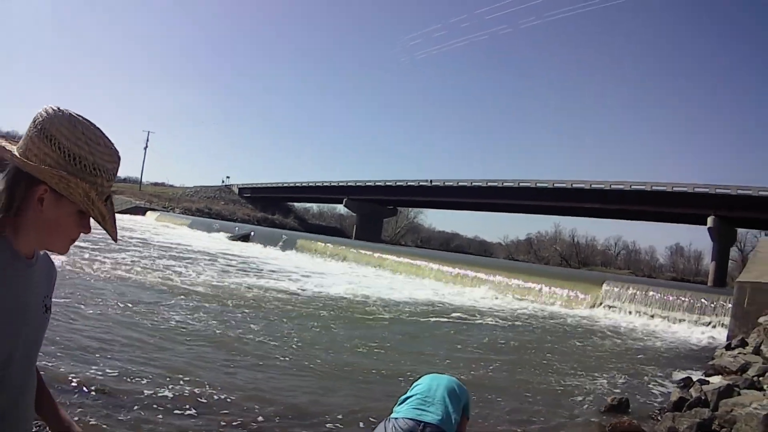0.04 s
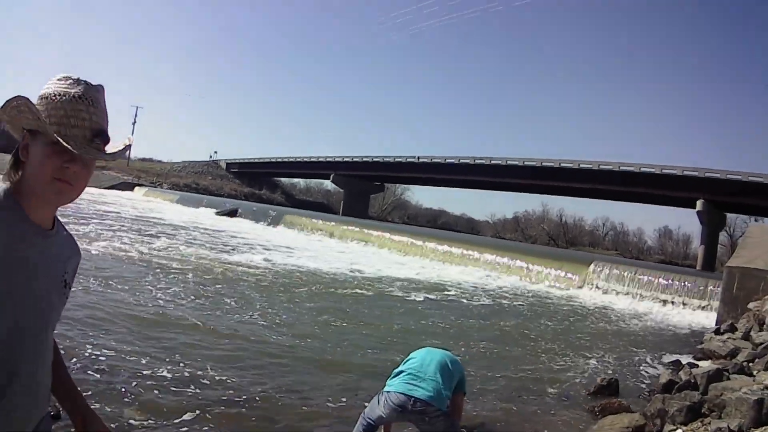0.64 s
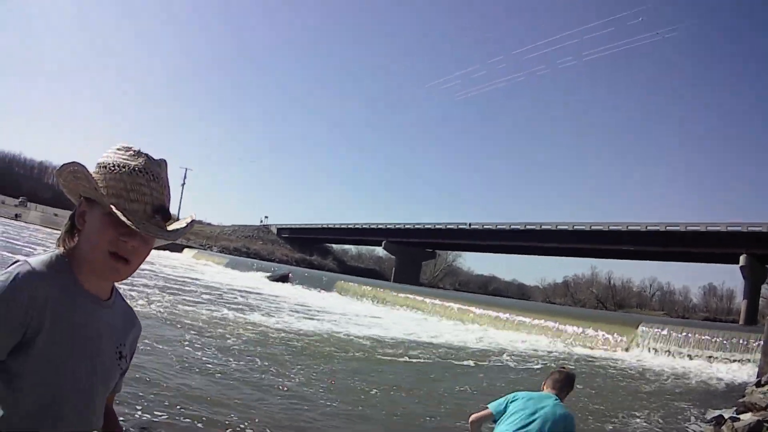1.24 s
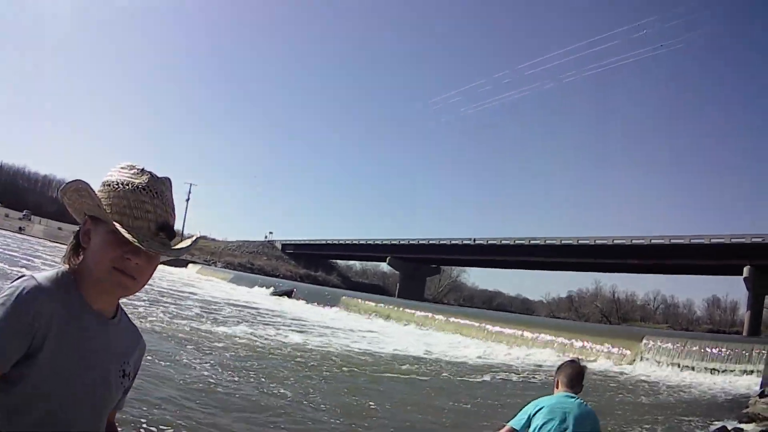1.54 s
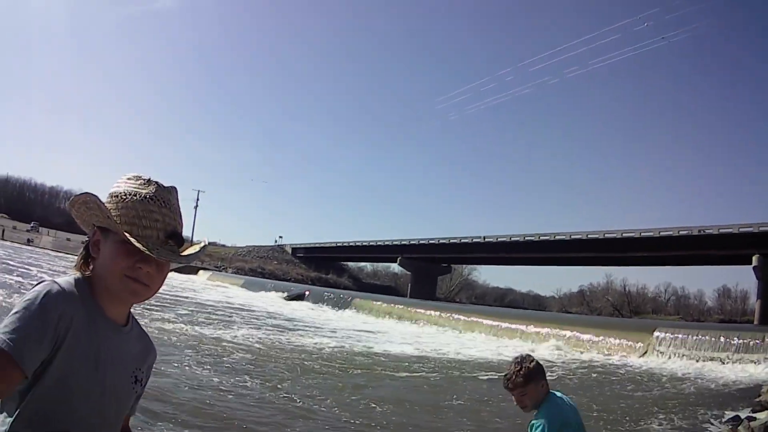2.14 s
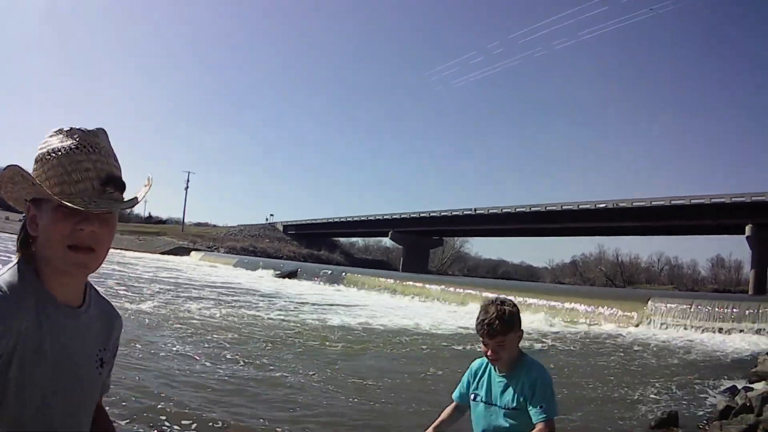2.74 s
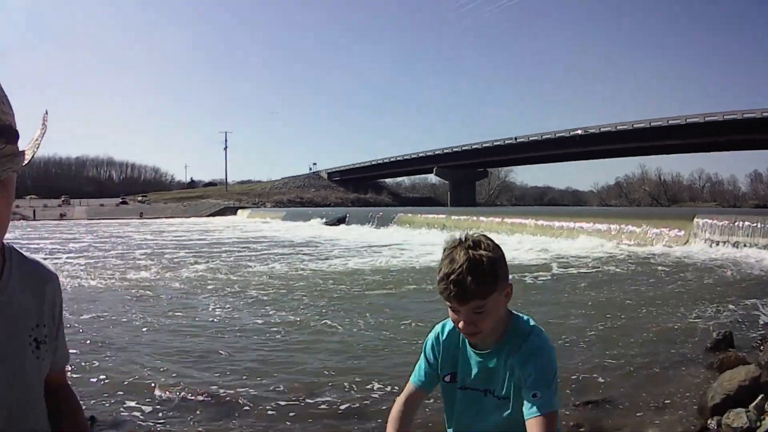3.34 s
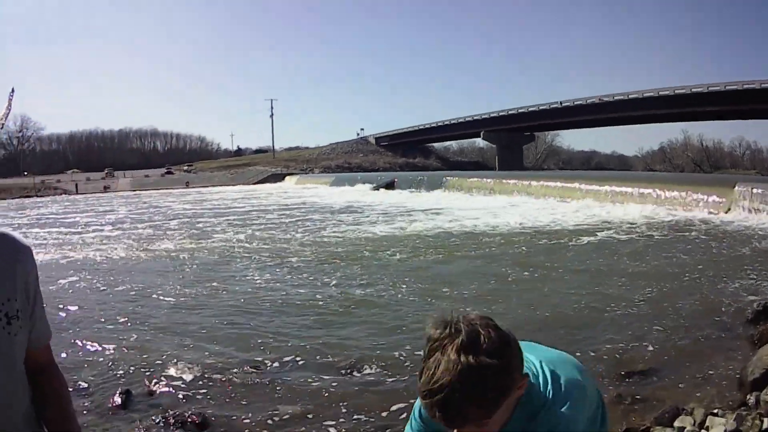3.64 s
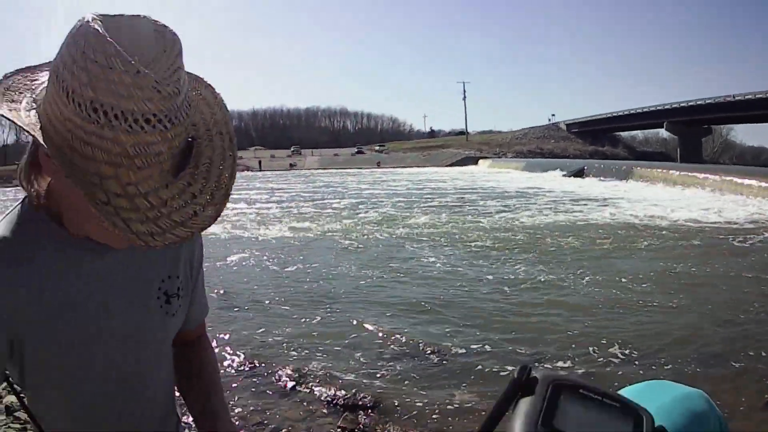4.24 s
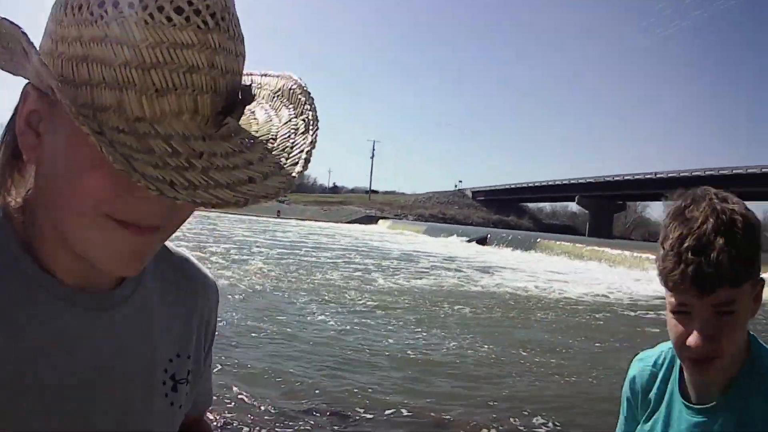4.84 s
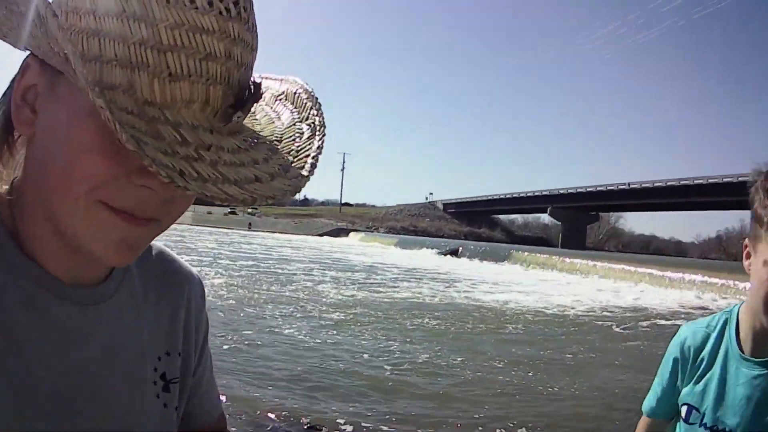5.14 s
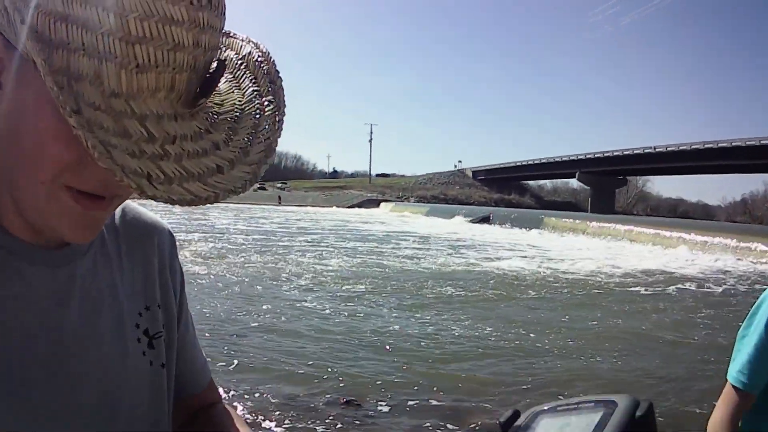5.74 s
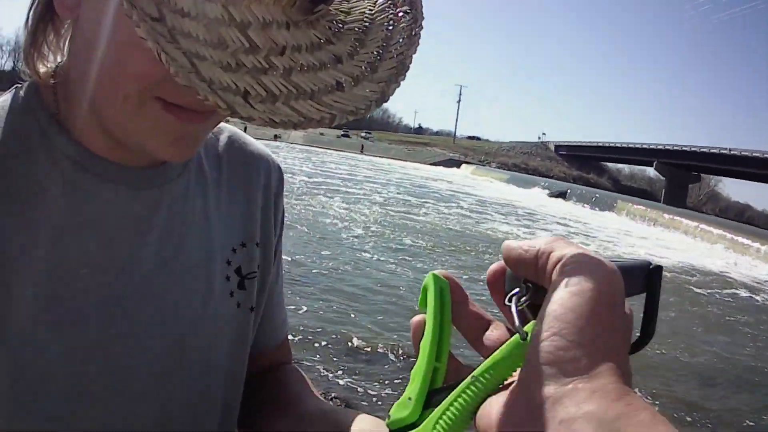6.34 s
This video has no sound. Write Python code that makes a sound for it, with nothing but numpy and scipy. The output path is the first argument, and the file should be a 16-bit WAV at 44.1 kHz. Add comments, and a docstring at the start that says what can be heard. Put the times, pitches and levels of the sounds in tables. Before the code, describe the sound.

Outdoors on a riverbank, a body-worn microphone picks up the constant roar and hiss of water churning below a weir. Close handling noises sit on top: first a short, hard rub with a crack, then scattered clicks of gear, then a bunch of hollow plastic knocks. A brief, dull rustle follows as the water keeps rushing on.

```python
"""Low weir from the rocky bank

A river pours over a low weir and churns below it, heard on the microphone of a body-worn camera. Clouds of
bubbles make a steady, dull roar and a hiss; wavelets fizz at the shore, and the treble shifts as the wearer
turns. Right at the microphone something rubs hard across the camera, and a piece of hollow plastic gear handled
close by is bumped a few times. Nearby, gear clicks, pings and rustles."""
import sys
import numpy as np
from scipy import signal
from scipy.io import wavfile
from scipy.ndimage import uniform_filter1d

SR = 44100
rng = np.random.default_rng(int(sys.argv[2]) if len(sys.argv) > 2 else 0)


def int16_out(signal):
    """Quantize to a 16-bit WAV file."""
    q = np.round(np.clip(np.atleast_2d(signal).T, -1, 1) * 32767)
    wavfile.write(sys.argv[1], SR, q.astype(np.int16))


N = 291302


def gain_of(db):
    """Decibels to amplitude."""
    return 10 ** (np.asarray(db) / 20)


def unit_rms(x):
    """Scales to an rms of one."""
    return x / np.sqrt(np.mean(x ** 2) + 1e-20)


def level_at(spectrum, hz):
    """A spectrum's level in dB, interpolated on a log-frequency axis."""
    f, db = np.transpose(spectrum)
    return np.interp(np.log(hz + 1), np.log(f + 1), db)


def band(hz, centre_hz, octaves):
    """A smooth bell of height one on a log-frequency axis."""
    return np.exp(-(np.log2((hz + 1) / centre_hz) / octaves) ** 2)


def follow(rows, t):
    """Reads each column of a curve at the times t."""
    s, *columns = np.transpose(rows)
    return [np.interp(t, s, c) for c in columns]


def ramp(t, middle_s, takes_s):
    """A straight fade from zero to one."""
    return np.clip(.5 + (t - middle_s) / takes_s, 0, 1)


def onset(t, rise_s):
    """A sound takes a moment to build up."""
    return 1 - np.exp(-(t / rise_s) ** 2)


def decay(t, db, t60):
    """An envelope that starts at db and falls 60 dB in t60 seconds."""
    return gain_of(db - 60 * t / t60)


def mode(t, hz, db, t60):
    """One dying sine."""
    return decay(t, db, t60) * np.sin(2 * np.pi * hz * t)


def add(mix, s, sound):
    """Mixes a sound in at s seconds."""
    part = mix[round(s * SR):][:len(sound)]
    part += sound[:len(part)]


def coloured(x, spectrum, size=2048):
    """Causal filter with the given spectrum, so attacks stay sharp."""
    hz = abs(np.fft.fftfreq(size, 1 / SR))
    log_gain = np.log(gain_of(level_at(spectrum, hz)))
    minimum_phase = np.exp(signal.hilbert(log_gain).conj())
    taps = np.fft.ifft(minimum_phase).real[:size // 2]
    return signal.oaconvolve(x, taps)[:len(x)]


# treble at the microphone as the wearer turns: t/s, relative level/dB
TURNING_TREBLE = [(0.0, -52.5), (1.78, -51.5), (2.3, -53.5), (2.78, -50.5), (3.83, -53.5), (4.73, -50.5),
                  (5.21, -53), (6.61, -55)]
# the water's reflection off a hand and gear raised near the microphone: t/s, level/dB
HAND_REFLECTION = [(0, -0.5), (2.5, 1), (3.7, 3.5), (4.3, 6.5), (5.2, -3), (5.8, 3.5), (6.2, -2.5)]
REFLECTION_DELAY_S = .00131
# two hollow resonances drifting in the hiss: t/s, lower f/Hz, level/dB, upper f/Hz, level/dB
HISS_RESONANCES = [(0, 2080, -2, 4200, -3.5), (.8, 2050, 1, 4200, -1.5), (1.4, 2090, 1.5, 4150, 2.5),
                   (2.7, 2160, -3.5, 4190, 4), (3.6, 2210, -1, 4130, -1.5), (4.7, 2380, -1, 4290, 2),
                   (5.3, 2330, 2, 4200, -0.5), (6.6, 2430, 1, 4160, 7.5)]

def water(spectrum, shaded, patchy_db, surge_db, size=1024):
    """Countless bubbles heard from the bank: clouds swell in patches of pitch, and the flow surges."""
    hop = size // 4
    t = np.arange(N // hop + 5)[:, None] * hop / SR
    hz = np.fft.rfftfreq(size, 1 / SR)
    real, imag, clouds = rng.standard_normal((3, len(t), len(hz)))
    clouds = uniform_filter1d(clouds, size=12, axis=0)
    clouds = unit_rms(uniform_filter1d(clouds, size=8, axis=1))
    surge = unit_rms(uniform_filter1d(rng.standard_normal(len(t)), size=30))
    field_db = patchy_db * clouds + surge_db * surge[:, None]
    # a person steps between weir and microphone
    shade = ramp(t, middle_s=3.9, takes_s=0.82)
    field_db += (1 - shade) * level_at(spectrum, hz) + shade * level_at(shaded, hz)
    # then leans close and throws back the low middle of the roar
    field_db += 2 * ramp(t, middle_s=5.0, takes_s=.3) * band(hz, centre_hz=483, octaves=0.49)
    # the delayed reflection lifts or dips a comb of bands
    comb = np.cos(np.pi * hz * REFLECTION_DELAY_S) ** 2 * band(hz, centre_hz=1030, octaves=0.75)
    field_db += follow(HAND_REFLECTION, t)[0] * comb
    # turning changes mainly the short waves around the microphone's presence peak
    treble_db = follow(TURNING_TREBLE, t)[0]
    field_db += (treble_db - treble_db.min()) * band(hz, centre_hz=3820, octaves=1.6)
    low_hz, low_db, high_hz, high_db = follow(HISS_RESONANCES, t)
    field_db += low_db * band(hz, low_hz, octaves=0.11) + high_db * band(hz, high_hz, octaves=0.11)
    frames = (real + 1j * imag) * gain_of(field_db)
    _, noise = signal.istft(frames.T, nperseg=size, noverlap=size - hop)
    return unit_rms(noise[:N])


# churning water below the weir: f/Hz, relative level/dB
ROAR_SPECTRUM = [(12, -60), (20, -26.5), (53, -31), (115, -6), (149, -8.5), (194, -1), (243, 0.5),
                 (333, -1), (410, -3), (572, -8), (624, -10), (770, -14), (933, -18.5), (1110, -19),
                 (1300, -27.5), (1690, -44.5), (2860, -120)]

def roar():
    """The deep churn below the weir; its long waves bend round a person, so it is never shaded."""
    return gain_of(-22) * water(ROAR_SPECTRUM, ROAR_SPECTRUM, patchy_db=0.69, surge_db=0.04)


# bursting foam, microphone facing the weir: f/Hz, relative level/dB
FOAM_OPEN = [(900, -32.5), (1350, 1.5), (1750, -1), (2100, 0.5), (2500, -7), (2850, -6.5), (3450, -16),
             (3750, -13.5), (4300, -13.5), (4850, -22.5), (6100, -21.5), (7500, -32.5), (9700, -32),
             (12000, -67)]
# the same foam with a person close in front: f/Hz, relative level/dB
FOAM_BEHIND_PERSON = [(900, -34), (1400, 5), (1950, -2.5), (2400, -3.5), (2650, -8.5), (2950, -9.5),
                      (3150, -13.5), (3500, -15), (4250, -15.5), (4850, -20), (6200, -21.5), (7500, -32),
                      (9700, -32.5), (12000, -68.5)]

def foam():
    """Foam bursts at the weir in a hiss that hardly swells."""
    return gain_of(-41) * water(FOAM_OPEN, FOAM_BEHIND_PERSON, patchy_db=1.0, surge_db=.35)


def wavelets(bubbles_per_s, spread_db, pitches=30):
    """Small bubbles at the shore each ring for a few cycles, rising in pitch."""
    t, out = np.arange(SR // 50) / SR, np.zeros(N)
    for hz in np.geomspace(800, 7000, pitches):
        births = rng.random(N) < bubbles_per_s / pitches / SR
        strengths = gain_of(spread_db * np.minimum(rng.exponential(1, N), 3))
        bubble = onset(t, 1 / hz) * np.exp(-hz * t / 4.0) * np.sin(2 * np.pi * hz * t * (1 + 4 * t))
        weight = hz * gain_of(level_at(FOAM_OPEN, max(hz, 1350)))
        out += weight * signal.oaconvolve(births * strengths, bubble)[:N]
    return gain_of(-57.5) * unit_rms(out)


# colour of a hard crack: f/Hz, relative level/dB
CRACK_SPECTRUM = [(400, -7.5), (1100, 1), (1500, 1), (2300, 0), (2900, 1.5), (3900, 1.5), (4900, -8),
                  (6400, -6), (8000, -16.5), (9700, -26.5), (12500, -47)]
# gear clicking near the microphone: t/s, ring level/dB, f/Hz, crack level/dB, t60/s
GEAR_CLICKS = [(0.7789, -17.5, 1070, -46, 0.029), (1.9118, -14.5, 2270, -23, 0.0093),
               (1.9132, -22, 3200, -23, 0.0079), (2.347, -35, 4170, -35, .016),
               (2.7006, -23, 1720, -28, 0.012), (2.7025, -25, 4400, -32, .009),
               (2.7055, -26, 2000, -28, .02), (2.7088, -33, 4060, -32, .016), (2.716, -21, 2250, -34, .02),
               (3.307, -37, 4300, -37, 0.016), (3.3135, -28, 2230, -36, .02),
               (3.3447, -34, 4000, -43, 0.014), (4.0982, -24, 2220, -35, .016),
               (4.099, -20.5, 4120, -33, 0.014), (4.4755, -35, 5820, -39, .012),
               (4.4915, -37, 6540, -36, 0.0085), (4.785, -24, 2270, -33, .016),
               (4.7967, -33, 3500, -33, 0.017), (5.1185, -22, 3750, -27, 0.01),
               (5.1235, -35, 3920, -31, .016), (5.6182, -32, 2920, -38, 0.013),
               (5.6605, -34, 4040, -36, .012), (5.87, -31, 3830, -35, 0.013), (5.94, -38, 3750, -42, .012)]
TICKS_PER_S, TICK_DB, TICK_HZ, TICK_T60_S = 1.2, -41, 4160, 0.014

def clicks(rise_s):
    """Hard gear clicks with a broad crack and one short ring; fainter ticks fall at random."""
    t, out = np.arange(SR // 16) / SR, np.zeros(N)
    tick_times = rng.uniform(0, N / SR, round(TICKS_PER_S * N / SR))
    ticks = [(s, TICK_DB, TICK_HZ, TICK_DB, TICK_T60_S) for s in tick_times]
    for s, ring_db, hz, crack_db, t60 in GEAR_CLICKS + ticks:
        noise = unit_rms(coloured(rng.standard_normal(len(t)), CRACK_SPECTRUM))
        crack = noise * decay(t, crack_db, t60)
        add(out, s, onset(t, rise_s) * (mode(t, hz, ring_db, t60) + crack))
    return out


def stroke(start_s, attack_s, hold_s, release_s, db):
    """Pressure of one stroke: it builds, holds and lets go."""
    corners = start_s + np.cumsum([0, attack_s, hold_s, release_s])
    return gain_of(db) * np.interp(np.arange(N) / SR, corners, [0, 1, 1, 0])


def slips(pressure, per_s, noise_floor):
    """Friction: dense tiny slips under a rising and falling pressure."""
    noise = rng.standard_normal(N)
    slipping = rng.random(N) < per_s / SR
    return pressure * unit_rms(noise * (noise_floor + slipping))


# the rub catching on the camera: t/s, pressure level/dB
RUB_CATCHES = [(0.953, -21), (0.961, -9), (.9655, -21), (0.974, -20), (0.9805, -21), (0.9826, -14),
               (0.991, -21)]

def catches(rise_s, t60):
    """Brief spikes of pressure where the rub sticks and breaks free."""
    t, out = np.arange(SR // 16) / SR, np.zeros(N)
    for s, db in RUB_CATCHES:
        add(out, s, onset(t, rise_s) * decay(t, db, t60))
    return out


# colour of a rub right at the microphone: f/Hz, gain/dB
RUB_SPECTRUM = [(200, -11), (500, -19), (1050, 12.5), (1400, -8), (2250, -3), (2600, -7), (3100, -2),
                (3600, -1), (4400, -11.5), (5200, -16), (6200, -17), (7800, -22), (9600, -18), (12500, -29)]
# resonances of the rubbed case: f/Hz before the slide, f/Hz after it, width/Hz, relative level/dB
RUB_RESONANCES = [(490, 480, 260, 2), (990, 1030, 180, -2), (1350, 1400, 150, 0.5), (1720, 2040, 310, 3),
                  (2200, 2190, 190, 2), (3380, 3120, 580, 0), (3500, 3550, 430, -6),
                  (5150, 4800, 560, -8.5), (5500, 5800, 400, -15.5), (6650, 6650, 370, -13),
                  (7350, 7600, 700, -17)]

def hard_rub(start_s, attack_s, hold_s, plain_db, ring_db):
    """A quick rub rasps in the case's resonances, which shift as it slides; speed brightens it."""
    t = np.arange(N) / SR
    pressure = stroke(start_s, attack_s, hold_s, release_s=.026, db=-28)
    pressure += catches(rise_s=0.0012, t60=0.0095)
    friction = slips(pressure, per_s=800, noise_floor=0.11)
    speed = np.interp(t, [start_s, start_s + attack_s + hold_s], [.25, 1])
    slide = ramp(t, middle_s=0.98, takes_s=.012)
    ring = np.zeros(N)
    for first_hz, last_hz, width_hz, db in RUB_RESONANCES:
        hz = first_hz + (last_hz - first_hz) * slide
        drive = friction * speed ** (hz / 6500)  # a slow rub holds back the high resonances most
        ring += gain_of(db) * resonate(drive, hz, width_hz)
    return gain_of(plain_db) * coloured(friction * speed, RUB_SPECTRUM) + gain_of(ring_db) * ring


def resonate(x, hz, width_hz):
    """A steep resonance of gain one that follows the curve hz."""
    carrier = np.exp(2j * np.pi * np.cumsum(hz) / SR)
    pole = np.exp(-np.pi * width_hz / SR)
    baseband = signal.lfilter([(1 - pole) ** 2], [1, -2 * pole, pole * pole], x / carrier + 1e-18)
    return 2 * (carrier * baseband).real


# modes of the snap on the camera: f/Hz, level/dB, t60/s
SNAP_MODES = [(1040, -11, .028), (1630, -1, 0.015), (3340, -6.5, 0.011), (5400, -19.5, .011),
              (6750, -25, 0.012), (7920, -27, .013), (9500, -34, .012), (10800, -35, .012)]

def snap(at_s, rise_s, crack_db, crack_t60):
    """The rub ends as the edge slips free: a sharp crack and a short hollow ring."""
    t, out = np.arange(SR // 16) / SR, np.zeros(N)
    ring = sum(mode(t, hz, db, t60) for hz, db, t60 in SNAP_MODES)
    noise = unit_rms(coloured(rng.standard_normal(len(t)), CRACK_SPECTRUM))
    crack = noise * decay(t, crack_db, crack_t60)
    add(out, at_s, onset(t, rise_s) * (ring + crack))
    return out


# a small metal clip nearby: t/s, level/dB, t60/s
METAL_PINGS = [(3.3075, -54, .07), (4.778, -61, .3), (4.9245, -60, .1)]

def pings(hz):
    """A small metal clip rings on one thin, high note."""
    t, out = np.arange(SR // 8) / SR, np.zeros(N)
    for s, db, t60 in METAL_PINGS:
        add(out, s, mode(t, hz, db, t60))
    return out


# modes of a hollow plastic piece of gear handled near the microphone: f/Hz, relative level/dB, t60/s
GEAR_MODES = [(807, 5, 0.076), (1002, 1, 0.032), (1220, -3.5, 0.018), (1310, 5, 0.013), (1472, -2, 0.021),
              (1560, -8, 0.019), (1950, -4, 0.013), (2430, -12.5, 0.019), (2690, -20, 0.0098),
              (3450, -22, .014), (3830, -18, .016), (4200, -18, .016)]
# what the plastic passes to the microphone, little of the top treble: f/Hz, gain/dB
GEAR_TRANSMISSION = [(2300, -1.0), (3200, -15), (4300, -12), (5000, -16), (12000, -17)]
# colour of something dragging on the gear: f/Hz, relative level/dB
CRUNCH_SPECTRUM = [(400, -14), (1050, 10), (1500, 7.5), (2300, 5), (2900, -6), (3450, -3), (4200, -5.5),
                   (4900, -24), (6500, -20), (8000, -32), (12500, -41)]
# contacts bunched into rattling knocks: t/s, ring level/dB, favoured f/Hz, crunch level/dB
GEAR_CONTACTS = [(4.0295, -19, 1700, -38), (4.0347, -7, 1590, -30), (4.383, -18, 1400, -39),
                 (4.4345, -7, 1080, -24), (4.4385, -11, 1310, -26), (4.455, -9.5, 1100, -25.5),
                 (4.4675, -14, 1100, -30), (4.474, -15.5, 1500, -36), (4.6555, -13.5, 2100, -25),
                 (4.664, -9.5, 1160, -31), (4.677, -20, 1500, -31), (4.683, -9, 1400, -30),
                 (4.797, -16, 1610, -25), (4.908, -21, 1710, -35)]

def bumps(octaves, rise_s, drag_db, drag_t60, crunch_t60):
    """Each contact rings the hollow gear and drags with a crunch; each favours the modes near its own pitch."""
    t, out = np.arange(SR // 6) / SR, np.zeros(N)
    for s, db, favoured_hz, crunch_db in GEAR_CONTACTS:
        ring = sum(mode(t, hz, mode_db, t60) / (1 + (np.log2(hz / favoured_hz) / octaves) ** 2)
                   for hz, mode_db, t60 in GEAR_MODES)
        ring *= onset(t, rise_s)
        friction = rng.standard_normal(len(t))
        drag = signal.fftconvolve(friction * decay(t, 0, drag_t60), ring)[:len(t)]
        body = ring / abs(ring).max() + gain_of(drag_db) * drag / abs(drag).max()
        crunch = unit_rms(coloured(friction, CRUNCH_SPECTRUM)) * decay(t, crunch_db, crunch_t60)
        add(out, s, gain_of(db) * coloured(body, GEAR_TRANSMISSION) + crunch)
    return out


# hollow notes under the loudest knocks: t/s, level/dB, f/Hz, t60/s, time until damped/s
CLUNK_NOTES = [(4.038, -18, 765, .11, 0.012), (4.4345, -12, 800, .33, .011),
               (4.4428, -3.5, 730, .15, .0095), (4.4495, -9, 835, .33, .029)]

def clunks(fade_s):
    """The air in a hollow piece of gear sounds briefly, until the grip damps it."""
    out = np.zeros(N)
    for s, db, hz, t60, length_s in CLUNK_NOTES:
        t = np.arange(round(length_s * SR)) / SR
        fade_in_out = onset(t, fade_s) * onset(t[::-1], fade_s)
        add(out, s, fade_in_out * mode(t, hz, db, t60))
    return out


def rustle():
    """Soft, dull rustling as a hand lifts something past the microphone."""
    pressure = stroke(start_s=5.6, attack_s=.19, hold_s=.11, release_s=.12, db=-31.5)
    # f/Hz, gain/dB
    dull = [(450, -9), (830, 15.0), (1150, 1.5), (1700, 3), (2500, -12), (4200, -25), (12000, -57)]
    return coloured(slips(pressure, per_s=320, noise_floor=0.023), dull)


def scene():
    """The river from the bank, in mono, with handling noise close to the microphone."""
    knocks = bumps(octaves=0.39, rise_s=0.00046, drag_db=-5.0, drag_t60=0.085, crunch_t60=0.051)
    knocks += clunks(fade_s=0.0014)
    rubs = hard_rub(start_s=.953, attack_s=.03, hold_s=.015, plain_db=-4.0, ring_db=17.0)
    rubs += snap(at_s=1.0038, rise_s=0.00069, crack_db=-21, crack_t60=0.028)
    gear = rustle() + clicks(rise_s=0.00062) + pings(hz=8920)
    river = roar() + foam() + wavelets(bubbles_per_s=800, spread_db=1.5)
    return (river + gear + rubs + knocks)[None]


def record(dry):
    """The camera's band limit cuts the top treble."""
    lowpass = signal.firwin(511, cutoff=12700, window=("kaiser", 9), fs=SR)
    return signal.oaconvolve(dry, lowpass[None], "same")


dry = scene()
out = record(dry)
int16_out(out)
```